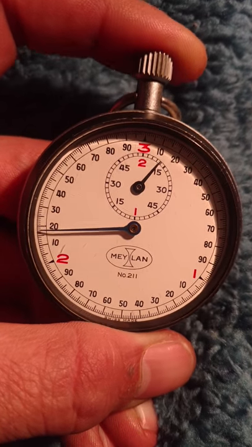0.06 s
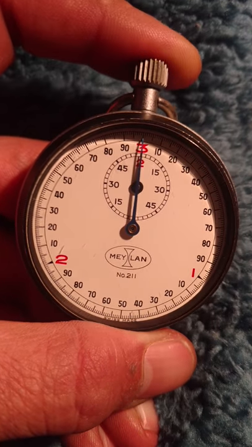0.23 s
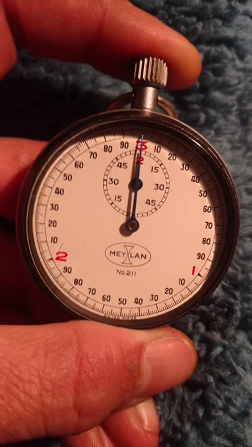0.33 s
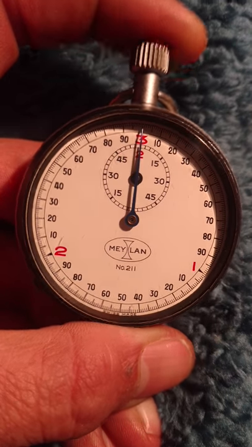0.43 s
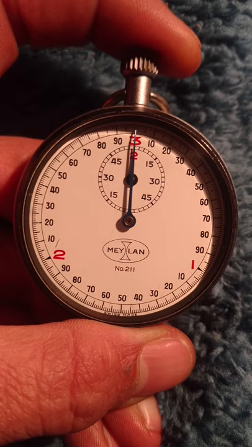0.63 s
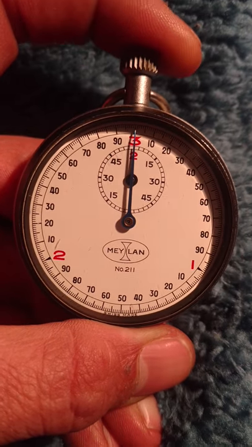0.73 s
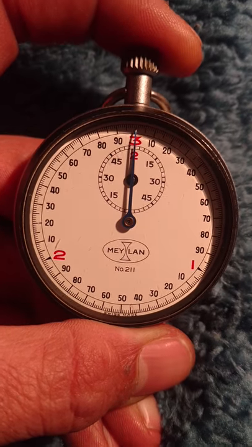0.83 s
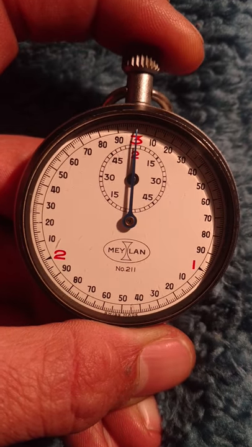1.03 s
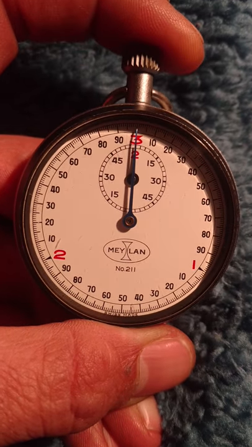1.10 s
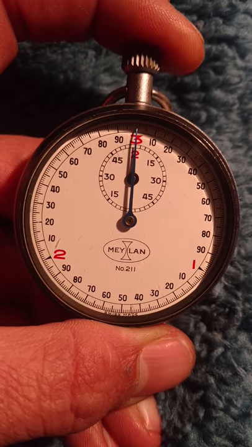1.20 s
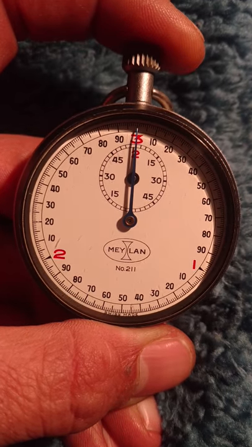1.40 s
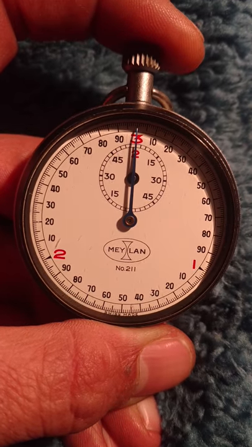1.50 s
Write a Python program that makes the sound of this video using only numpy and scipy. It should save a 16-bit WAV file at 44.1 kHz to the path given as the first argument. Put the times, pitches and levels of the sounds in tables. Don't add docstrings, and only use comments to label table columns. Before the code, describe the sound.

Loud, crisp click of a mechanical stopwatch button, followed by two weaker clicks over faint fan hum

```python
import sys
import numpy as np
from scipy import signal
from scipy.fft import rfft, irfft
from scipy.io import wavfile
from scipy.ndimage import uniform_filter1d

SR = 44100
rng = np.random.default_rng(int(sys.argv[2]) if len(sys.argv) > 2 else 0)


def log_audio(samples):
    frames = np.atleast_2d(samples).T
    limited = np.clip(frames, -1, 1)
    pcm = np.round(limited * 32767).astype(np.int16)
    wavfile.write(sys.argv[1], SR, pcm)


def gain_from_db(level_db):
    decades = np.asarray(level_db, float) / 20
    return 10 ** decades


N = 68355
LEFT_RIGHT = np.array([[1], [-1]])


def colour(points, count):
    points = np.array(points)
    f = np.arange(N // 2 + 1) * SR / N + 1
    gain_db = np.interp(np.log(f), np.log(points[:, 0]), points[:, 1])
    x = irfft(rfft(rng.standard_normal((count, N))) * gain_from_db(gain_db), N)
    return x / x.std()


def walk(rate_hz):
    k = int(SR / rate_hz)
    wander = uniform_filter1d(uniform_filter1d(rng.standard_normal(N), k), k)
    return (wander - wander.mean()) / wander.std()


def lowpass(x, order, hz):
    return signal.sosfilt(signal.butter(order, hz, fs=SR, output="sos"), x)


def lows_in_phase(x, hz):
    return signal.sosfiltfilt(signal.butter(2, hz, fs=SR, output="sos"), x)


def decay(t, t60_s):
    return np.exp(-np.log(1000) * t / t60_s)


SNAP_S, DUCK_DB, GRAB_S, HOLD_S = 0.2369, -12, 0.00092, 0.121
EARLY_RECOVER_DB_PER_S, RECOVER_DB_PER_S = 13, 9.5


def duck_db():
    t = np.arange(N) / SR - SNAP_S
    recovery = np.minimum(DUCK_DB + RECOVER_DB_PER_S * np.maximum(t - HOLD_S, 0), 3)
    grabbed = 1 / (1 + np.exp(np.clip(-t / GRAB_S, -50, 50)))
    return recovery * grabbed + EARLY_RECOVER_DB_PER_S * np.minimum(t, 0)


# f/Hz, level/dB per Hz
AIR = [(40, -22), (75, -15), (130, -1.5), (400, -5.5), (800, 0.5), (1150, 0.5), (1600, -10), (2600, -29)]
AIR_DB, AIR_SIDE_DB, AIR_ALIKE_HZ, AIR_TOP_HZ = -53.5, -11.5, 890, 2695


def air():
    mid, side = lowpass(colour(AIR, count=2), 4, AIR_TOP_HZ) * gain_from_db(0.75 * walk(2.3))
    side = gain_from_db(AIR_SIDE_DB) * lowpass(side, 1, AIR_ALIKE_HZ)
    return gain_from_db(AIR_DB) * np.array([mid + side, mid - side])


# f/Hz, level/dB rms
HUM = [(163, -77.5), (728, -74.5), (1110, -77), (1172, -75.5)]
# multiple of the shaft rate, level/dB rms
MOTOR = [(1, -69.5), (2, -72), (3, -74.5), (4, -68), (5, -64.5), (6, -76.5), (7, -78.5), (8, -66.5),
         (10, -70)]
MOTOR_HZ, MAINS_HZ, MAINS_DB = 97.7, 120.2, -66
WOBBLE_RAD = 1.6


def fan():
    t = np.arange(N) / SR
    orders = [(round(k) * MOTOR_HZ, db) for k, db in MOTOR]
    out = air()
    for hz, db in HUM + [(MAINS_HZ, MAINS_DB)] + orders:
        phase = rng.uniform(0, 2 * np.pi) + WOBBLE_RAD * (hz / 1000) ** 2 * walk(23)
        port_phase = .55 * rng.uniform(-1.8, 1) * LEFT_RIGHT
        level = np.sqrt(2) * gain_from_db(db + 3 + walk(4))
        out += level * np.sin(2 * np.pi * hz * t + phase + port_phase)
    return out * gain_from_db(duck_db())


# f/Hz, level/dB per Hz
HISS = [(300, -27), (1000, 1), (2000, 0), (3200, -8), (6000, -15), (10000, -20), (15000, -28.5)]
HISS_DB, HISS_DUCK_SHARE, HISS_DUCK_HZ = -64.5, 0.26, 3130


def hiss():
    x = gain_from_db(HISS_DB) * colour(HISS, count=2)
    low = lows_in_phase(x, HISS_DUCK_HZ)
    return low * gain_from_db(duck_db()) + (x - low) * gain_from_db(HISS_DUCK_SHARE * duck_db())


def bursts(table):
    t, out = np.arange(N) / SR, 0
    for at, length, db, hz in table:
        band = [(hz / 3, -35), (hz / 2.4, 0), (hz * 2.0, 0), (hz * 2, -20), (hz * 8, -70)]
        out = out + gain_from_db(db) * colour(band, count=2) * np.exp(-((t - at) / length) ** 2)
    return out


# t/s, length/s, level/dB, f/Hz
THUMPS = [
    (.04, 0.0434, -61.5, 40.5),
    (.5, 0.048, -63.5, 51),
    (.75, 0.028, -69.5, 56),
    (1.44, .03, -67, 40.33),
]
THUMP_RIGHT = -.6


def hand_thumps():
    return bursts(THUMPS)[:1] * np.array([[1], [THUMP_RIGHT]])


# t/s, length/s, level/dB, f/Hz
RUBS = [
    (.06, 0.0493, -73.5, 9100),
    (.15, 0.063, -78.5, 4067),
]


def finger_rubs():
    return bursts(RUBS)


MID_FROM_HZ, MID_TO_HZ, HIGH_FROM_HZ, BODY_TO_HZ = 5000, 7000, 8000, 2500
BODY_SHARE = .9
CRACK_S = .0006


def strike(contacts, modes, crack_db):
    out, t = np.zeros(N), np.arange(8192) / SR
    modes = np.array(modes)
    hz, mode_db, t60 = modes[:, :1], modes[:, 1:2], modes[:, 2:]
    in_mid = (hz > MID_FROM_HZ) & (hz < MID_TO_HZ)
    phases = .3 * rng.standard_normal((len(contacts), len(modes))) + np.pi * np.arange(len(modes))
    for (at, db, mid_db, high_db, push_ms), phase in zip(contacts, phases):
        band_db = np.where(hz > HIGH_FROM_HZ, high_db, np.where(in_mid, mid_db, 0))
        gain = gain_from_db(mode_db + band_db + BODY_SHARE * db * (hz < BODY_TO_HZ))
        tones = np.sin(2 * np.pi * hz * t + phase[:, None])
        ring = (gain * tones * decay(t, t60)).sum(axis=0)
        crack = gain_from_db(crack_db + high_db) * np.diff(rng.standard_normal(8193)) * np.exp(-t / CRACK_S)
        push = 1 - np.exp(-t * 1000 / push_ms)
        i = int(at * SR)
        out[i:i + 8192] += gain_from_db(db) * (ring + crack) * push / 2
    return out


# t/s, level/dB, mid-case modes/dB, high modes/dB, push/ms
CONTACTS = [(.1775, -41, 0, -20.5, 0.36), (.1795, -46, 0.5, -21, 0.4), (.23314, -23.5, -4, -16, 1.1),
            (.23455, -12, 3, 11, 0.3), (.23484, -1, 3.5, 7.5, 0.411), (.2382, -7.5, -4.5, -12.5, .3),
            (.2413, -13.5, -9, -6, .3), (0.4746, -38.5, -11, -21.5, 0.5), (0.4787, -11, 7, 1.5, 0.197),
            (.4800, -15, -1.5, -4.5, 0.083), (.7353, -30.5, 12, -3.5, 0.1434),
            (.7361, -42.5, 17.5, -8, 0.424), (.2356, -12, 7, -3, .2), (.4810, -20.5, -4.5, -10.5, 0.166)]
# f/Hz, level/dB, t60/s
CASE = [(1068, -21.5, 0.0051), (2093, -15, 0.018), (3123, -13, 0.0075), (3446.3, 1, 0.016),
        (3399, -24, 0.066), (3526, -29, 0.093), (4073, -9.5, 0.0042), (4749, -16, .012),
        (5134.5, -18, 0.0071), (6298, -5.5, 0.01), (8223, -8.5, .005), (10100, -3.5, 0.0032),
        (11607, -16.5, 0.006), (14850, -14.5, .005)]


def case():
    return strike(CONTACTS, CASE, crack_db=-17)


# f/Hz, level/dB, t60/s
LEVERS = [(680, -17.5, 0.0058), (1520, -23.5, 0.0027), (2656, -19.5, 0.018), (7110, -7, 0.0092),
          (8730, -14.5, 0.0043), (11935, -11.5, .006), (3486, -34.5, 0.16), (3620, -34, .07),
          (330.22, -26.5, 0.0091), (4510, -20, .005)]


def levers():
    return strike(CONTACTS, LEVERS, crack_db=-np.inf)


# f/Hz, level/dB per Hz
RATTLE = [(500, -24.5), (2500, -7), (6000, 1.5), (11500, -3.5), (13000, -14), (15000, -6.5)]
RATTLE_DB, RATTLE_T60_S, RATTLE_GRAIN_DB = -31.5, .035, 2.5
RATTLE_STEEP = 1.7


def rattle():
    t, env = np.arange(N) / SR, 0
    for at, db, *_ in CONTACTS:
        since = np.maximum(t - at, 0)
        onset = np.minimum(since / 0.001, 1)
        env = env + gain_from_db(RATTLE_STEEP * db) * onset * decay(since, RATTLE_T60_S)
    return gain_from_db(RATTLE_DB + RATTLE_GRAIN_DB * walk(600)) * env * colour(RATTLE, count=1)[0]


# t/s, level/dB, mid modes/dB, high modes/dB, push/ms
PLUCKS = [
    (.2365, -22, 0, 0, 0.41),
    (.4793, -17.5, 0, 0, 0.197),
    (.738, -51.5, 0, 0, .3),
]
# f/Hz, level/dB, t60/s
SPRING = [(7480, 0, .022)]


def spring():
    return strike(PLUCKS, SPRING, crack_db=-np.inf)


def watch():
    return case() + levers() + rattle() + spring()


TAIL_DB, TAIL_T60_S, TAIL_HZ = -42, 0.2, 6900


def room(x):
    t = np.arange(N) / SR
    tail = colour([(500, -12), (TAIL_HZ, 0), (16000, -12)], count=2) * decay(t, TAIL_T60_S)
    tail = tail * np.minimum(t / 0.0095, 1)
    return gain_from_db(TAIL_DB) * signal.fftconvolve(x[None], tail, axes=1)[:, :N] / 10


def late(x, lag_s):
    return irfft(rfft(x) * np.exp(-2j * np.pi * np.arange(N // 2 + 1) * SR / N * lag_s), N)


FAR_PORT_DB, FAR_PORT_LAG_S, FAR_PORT_HZ = -7, .000385, 6500


def at_ports(w):
    treble = w - lows_in_phase(w, FAR_PORT_HZ)
    far = gain_from_db(FAR_PORT_DB) * late(treble, FAR_PORT_LAG_S)
    return (np.array([w, far]) + room(w)) * gain_from_db(duck_db())


def cut(x, hz):
    return signal.sosfilt(signal.ellip(8, .2, 70, hz, fs=SR, output="sos"), x)


STEER_LAG, STEER_DB = 17, -.5


def steer(ports):
    return ports - gain_from_db(STEER_DB) * np.roll(ports[::-1], STEER_LAG, axis=1)


HISS_TOP_HZ, TOP_HZ = 15200, 15350


def scene():
    ports = lowpass(at_ports(watch()), 16, TOP_HZ)
    ports = ports + cut(hiss() + finger_rubs(), HISS_TOP_HZ)
    return steer(ports) + fan() + hand_thumps()


def roll_off(x):
    return signal.sosfilt(signal.butter(12, 16630, fs=SR, output="sos"), x)


def record(dry):
    return roll_off(dry)


dry = scene()
out = record(dry)
log_audio(out)
```